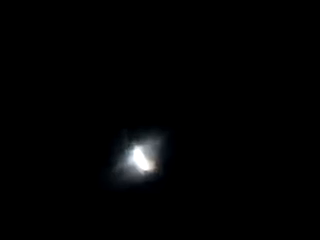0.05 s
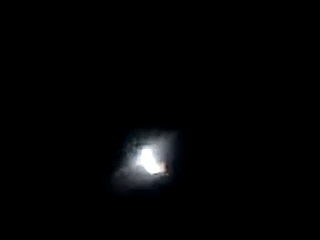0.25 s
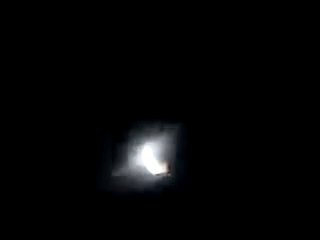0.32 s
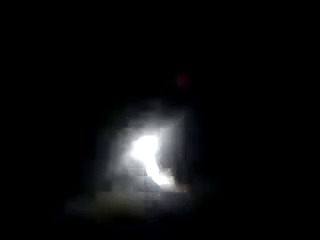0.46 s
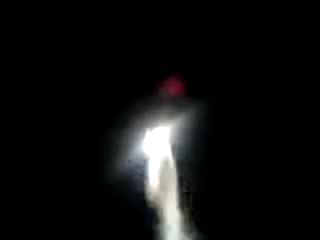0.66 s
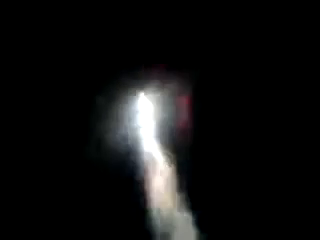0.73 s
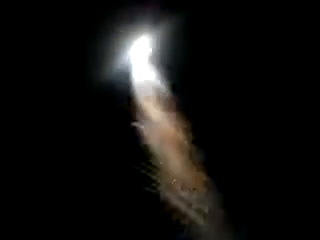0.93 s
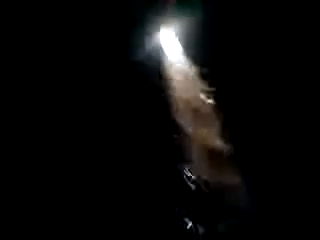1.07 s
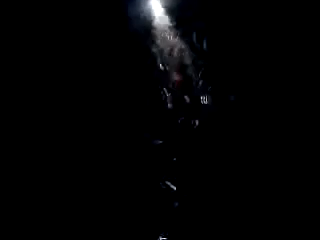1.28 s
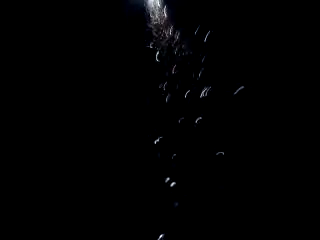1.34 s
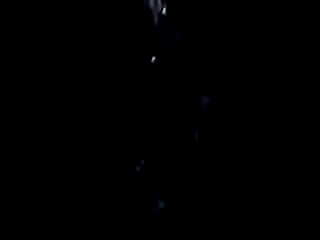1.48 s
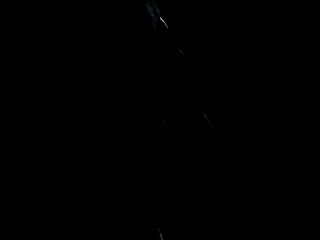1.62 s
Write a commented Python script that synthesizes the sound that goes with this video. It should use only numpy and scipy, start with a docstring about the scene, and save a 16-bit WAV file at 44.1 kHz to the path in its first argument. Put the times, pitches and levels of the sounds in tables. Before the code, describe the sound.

A firework rocket sputters and lifts off with a hissing roar that dulls away.

```python
"""Open ground at night: a firework rocket fizzes and sputters, catches, and roars upward.
Turbulent gas and popping grains make the hiss and roar; exhaust beating on the ground rumbles.
The ground echo lags more as it climbs, sweeping a hollow whoosh down along with a gliding noise band.
The jet dulls with distance and burns out with a soft chuff, leaving a faint outdoor tail."""
import sys
import numpy as np
from scipy import signal
from scipy.fft import rfft, irfft
from scipy.io import wavfile

SR = 44100
rng = np.random.default_rng(int(sys.argv[2]) if len(sys.argv) > 2 else 0)


def persist_wave(psi):
    """Save psi, clipped to +-1, as 16-bit WAV."""
    counts = np.round(np.clip(psi, -1, 1) * 32767).astype(np.int16)
    wavfile.write(sys.argv[1], SR, np.atleast_2d(counts).T)


N = 74970
T = np.arange(N) / SR
BIN_HZ = np.fft.rfftfreq(N, 1 / SR)

# Night air. Each row: frequency in Hz, relative density in dB.
AIR_SPECTRUM = [(20, -1), (70, -7), (170, 0), (400, -21.5), (2000, -9), (5500, -3), (9000, -33.5)]
# Burning charge. Each row: time in seconds, level in dB.
FIZZ_ENVELOPE = [(0, -44), (.11, -41.5), (.2, -37.5), (.28, -34.5), (.39, -29.5), (.46, -31.5), (.57, -29),
                 (.8, -27.5), (.92, -24.5), (1.0, -32.5), (1.12, -38.5), (1.16, -42), (1.36, -51.5),
                 (1.6, -63.5)]
# Burning charge. Each row: frequency in Hz, relative density in dB.
FIZZ_SPECTRUM = [(30, -33), (130, -5.5), (500, -11), (850, 1), (1200, -2), (1700, 0.5), (2300, 4),
                 (2900, -1), (3600, -4.5), (4400, -14.5), (5100, -5), (5900, 0), (7500, -1.5), (8300, -10),
                 (9000, -38)]
# Nozzle resonances. Each row: centre in Hz, half-width in Hz, level in dB relative to the fizz.
NOZZLE_WHISTLES = [(1990, 140, -18), (2370, 100, -17.5)]
# Bright flare of the passing rocket. Each row: time in seconds, level in dB.
FLARE_ENVELOPE = [(.7, -54), (.82, -36.5), (.85, -28.5), (.91, -30.5), (.97, -34), (1.12, -42.5),
                  (1.3, -67), (1.6, -93)]
# Charge catching. Each row: start in seconds, gain in dB, decay in seconds, centre in Hz.
CHARGE_SPITS = [(0.1208, -33, 0.0032, 900), (0.2191, -30, 0.0027, 740), (0.2393, -33, 0.006, 1340),
                (0.2489, -32, 0.0019, 920), (.5235, -20, 0.0054, 1220)]
# Low puffs. Each row: peak time in seconds, level in dB, attack and release in seconds, centre in Hz.
GAS_PUFFS = [(.124, -40.5, 0.0083, 0.0047, 161), (0.251, -32.5, 0.01, 0.0066, 134),
             (1.587, -35.5, 0.025, 0.014, 372), (1.611, -42, 0.034, 0.017, 197)]
# Jet. Each row: time in seconds, level in dB before dulling.
ROAR_ENVELOPE = [(0, -52), (.3, -54), (.44, -34.5), (.51, -27.5), (.58, -23), (.68, -22), (.73, -24),
                 (.83, -22.5), (.92, -23.5), (1.0, -24.5), (1.09, -26.5), (1.16, -28.5), (1.21, -29.5),
                 (1.32, -29), (1.38, -31.5), (1.5, -30), (1.6, -32.5), (1.64, -40), (1.7, -40)]
# Jet. Each row: frequency in Hz, relative density in dB.
ROAR_SPECTRUM = [(30, -42.5), (120, -21), (250, -10), (450, -4), (800, -1), (1400, 1), (2300, 1),
                 (3200, -7.5), (4300, -17), (5500, -11), (7600, -21), (9000, -43)]
# Exhaust on the ground. Each row: time in seconds, level in dB.
RUMBLE_ENVELOPE = [(0, -71), (.2, -66), (.42, -55.5), (.48, -38.5), (.6, -36.5), (.67, -45.5), (.76, -46.5),
                   (.86, -43), (.92, -47), (.98, -52), (1.3, -72.5), (1.58, -50), (1.7, -78)]
# Exhaust on the ground. Each row: frequency in Hz, relative density in dB.
RUMBLE_SPECTRUM = [(15, -8.5), (40, -7.5), (80, 7.5), (170, 10.5), (300, 13), (700, -7.5), (3000, -83.5)]
# Sinking whoosh. Each row: time in seconds, centre in Hz, level in dB.
WHOOSH_GLIDE = [(0.478, 1100, -46.5), (.57, 930, -35), (0.646, 790, -28.5), (0.719, 560, -40),
                (.82, 449.8, -33.5), (.87, 288.8, -40), (0.919, 192.3, -37.5), (.99, 170, -62.5),
                (1.15, 150, -59.5), (1.4, 140, -84)]
# Ground echo during the climb. Each row: time in seconds, lag in milliseconds.
ECHO_LAG_MS = [(0, .5), (.45, .58), (.6, 1.0), (.7, 1.62), (.8, 2.62), (.9, 3.83), (1.0, 5.25), (1.1, 6.68),
               (1.2, 7.8), (1.3, 8.63), (1.4, 9.2), (1.6, 9.85)]
# Ground echo, firmer as the plume clears the ground. Each row: time in seconds, linear gain.
ECHO_STRENGTH = [(.5, .28), (.8, .45), (1.3, .68)]
# Far reflections. Each row: frequency in Hz, gain in dB.
TAIL_RESPONSE = [(50, -47), (300, -19), (1000, 1), (2200, 4.5), (4000, 11), (6000, 4.5), (9000, -14.5)]


def amp(db):
    """Decibels to gain."""
    return 10 ** (np.asarray(db) / 20)


def unit(x):
    """Scales to rms 1."""
    return x / np.sqrt(np.mean(x ** 2) + 1e-20)


def curve(points):
    """Joins (seconds, value) points by straight lines."""
    return np.interp(T, *np.transpose(points))


def colour(x, points):
    """Filters by (Hz, dB) points on a log-frequency axis."""
    hz, db = np.transpose(points)
    return irfft(rfft(x) * amp(np.interp(np.log(BIN_HZ + 1), np.log(hz), db)), N)


def noise(bin_gain):
    """Spectrally weighted noise, rms 1."""
    return unit(irfft(rfft(rng.standard_normal(N)) * bin_gain, N))


def band(centre_hz, width_octaves):
    """Noise in one bell-shaped band."""
    offset = np.log2((BIN_HZ + 1) / centre_hz) / width_octaves
    return noise(1 / (1 + offset ** 2 / 2) ** 2)


def flutter(rms_db, low_hz=12, high_hz=70):
    """Wavering gain of an unsteady flame."""
    weight = BIN_HZ ** 2 / (BIN_HZ ** 2 + low_hz ** 2) ** 1.2 / (1 + (BIN_HZ / high_hz) ** 4)
    return amp(rms_db * noise(weight))


def night_air(level_db=-58):
    """Faint, steady outdoor background."""
    return amp(level_db) * unit(colour(rng.standard_normal(N), AIR_SPECTRUM))


def burning_gas(sparks_per_s=2000, spread_db=3.5, spark_share=0.23):
    """Turbulence mixed with the tiny pops of burning grains."""
    sizes = amp(spread_db * np.minimum(rng.exponential(1, N), 4))
    sparks = sizes * rng.choice([-1, 1], N) * (rng.random(N) < sparks_per_s / SR)
    return np.sqrt(1 - spark_share) * rng.standard_normal(N) + np.sqrt(spark_share) * unit(sparks)


def fizz(flicker_above_hz=7300):
    """Thin, whistling hiss of the charge, with a bright flare just after lift-off."""
    hiss = unit(colour(burning_gas(), FIZZ_SPECTRUM))
    hiss += sum(whistle(*row) for row in NOZZLE_WHISTLES)
    treble = signal.sosfiltfilt(signal.butter(6, flicker_above_hz, "high", fs=SR, output="sos"), hiss)
    hiss += treble * (unit(flutter(rms_db=1.5)) - 1.5)  # treble flickers at about half amplitude
    flare = band(centre_hz=3980, width_octaves=0.42) * amp(curve(FLARE_ENVELOPE))
    return (hiss * amp(curve(FIZZ_ENVELOPE)) + flare) * flutter(rms_db=0.5)


def whistle(centre_hz, half_width_hz, level_db):
    """Turbulence rings one narrow nozzle resonance."""
    return amp(level_db) * noise(1 / (1 + ((BIN_HZ - centre_hz) / half_width_hz) ** 2))


def spit(start_s, gain_db, decay_s, centre_hz):
    """Short, sharp burst of gas."""
    burst = rng.standard_normal(N) * (T >= start_s) * np.exp(-abs(T - start_s) / decay_s)
    bandpass = signal.butter(2, [centre_hz / 3, centre_hz * 1.6], "band", fs=SR)
    bandwidth_makeup = np.sqrt(SR / 2 / centre_hz)
    return amp(gain_db) * signal.lfilter(*bandpass, burst) * bandwidth_makeup


def puff(peak_s, level_db, attack_s, release_s, centre_hz):
    """Dull chuff as the charge catches or runs out."""
    envelope = np.exp(-np.maximum((peak_s - T) / attack_s, (T - peak_s) / release_s))
    return amp(level_db) * envelope * band(centre_hz, width_octaves=0.45)


def roar(recede_s=1.096, dull_db_per_khz_s=10.5):
    """Jet at full thrust, losing treble as it recedes."""
    jet = unit(colour(burning_gas(), ROAR_SPECTRUM))
    hz, frame_s, spectra = signal.stft(jet, SR, nperseg=512)
    loss_db = dull_db_per_khz_s * hz[:, None] / 1000 * np.maximum(frame_s - recede_s, 0)
    dulled = signal.istft(spectra * amp(-loss_db), SR, nperseg=512)[1][:N]
    return dulled * amp(curve(ROAR_ENVELOPE)) * flutter(rms_db=1.15)


def rumble():
    """Exhaust buffets the ground during lift-off."""
    buffeting = unit(colour(rng.standard_normal(N), RUMBLE_SPECTRUM))
    return buffeting * amp(curve(RUMBLE_ENVELOPE)) * flutter(rms_db=3.5)


def whoosh(width_hz=123):
    """Narrow band of exhaust noise gliding down."""
    time_s, centre_hz, level_db = np.transpose(WHOOSH_GLIDE)
    lowpass = 1 / (1 + (BIN_HZ / width_hz) ** 2) ** 2
    in_phase, quadrature = irfft(rfft(rng.standard_normal((2, N))) * lowpass, N)
    phase = 2 * np.pi * np.cumsum(np.interp(T, time_s, centre_hz)) / SR
    glide = unit(in_phase * np.cos(phase) + quadrature * np.sin(phase))
    fade_in = np.clip(T / time_s[0], 0, 1) ** 10
    return glide * amp(np.interp(T, time_s, level_db)) * fade_in


def ground_echo(x, cutoff_hz=2800):
    """Adds a softened echo whose growing lag sweeps a comb down the spectrum."""
    softened = signal.filtfilt(*signal.butter(1, cutoff_hz, fs=SR), x)
    echo = np.interp(T - curve(ECHO_LAG_MS) / 1000, T, softened)
    gain = curve(ECHO_STRENGTH)
    return (x + gain * echo) / np.hypot(1, gain)


def near_scatter(x, gain_db=-9.5, delay_s=0.0017, decay_s=0.0085, highpass_hz=1200):
    """Adds quick, weak reflections off close objects, rippling the upper spectrum."""
    taps = rng.standard_normal(N) * (T > delay_s) * np.exp(-T / decay_s)
    taps = signal.lfilter(*signal.butter(1, highpass_hz, "high", fs=SR), taps)
    scatter = signal.fftconvolve(x, taps / np.linalg.norm(taps))[:N]
    return (x + amp(gain_db) * scatter) / np.hypot(1, amp(gain_db))


def outdoor_tail(x, gain_db=-18.5, delay_s=0.05, t60_s=1.72):
    """Scattered far reflections dying away."""
    envelope = (T > delay_s) * amp(-60 * T / t60_s)
    taps = colour(rng.standard_normal(N), TAIL_RESPONSE) * envelope / np.linalg.norm(envelope)
    return amp(gain_db) * signal.fftconvolve(x, taps)[:N]


def scene():
    """Rocket over open ground, mono."""
    bursts = sum(spit(*row) for row in CHARGE_SPITS) + sum(puff(*row) for row in GAS_PUFFS)
    exhaust = fizz() + roar() + rumble()
    rocket = near_scatter(ground_echo(exhaust)) + whoosh() + bursts
    return (rocket + outdoor_tail(rocket) + night_air())[None]


def record(dry):
    """Narrow band of a small microphone."""
    cutoff_hz = 8950
    lowpass = signal.firwin(511, cutoff_hz, window=("kaiser", 9), fs=SR)
    return signal.oaconvolve(dry, lowpass[None], "same")


dry = scene()
out = record(dry)
persist_wave(out)
```